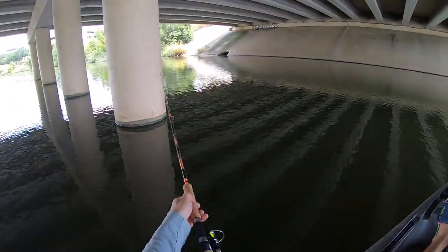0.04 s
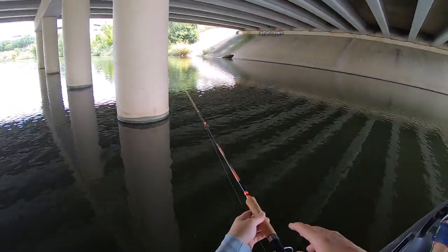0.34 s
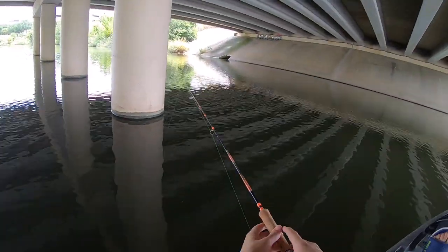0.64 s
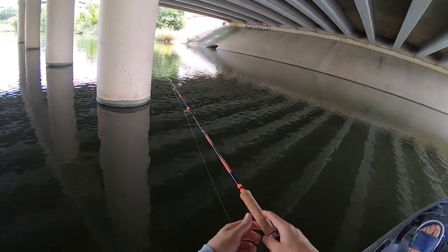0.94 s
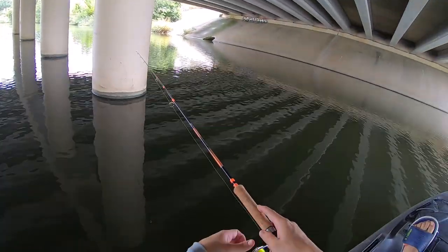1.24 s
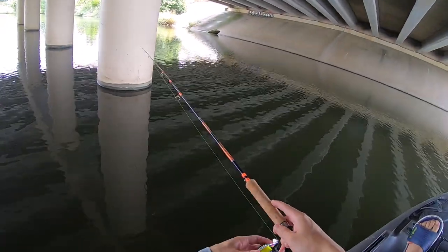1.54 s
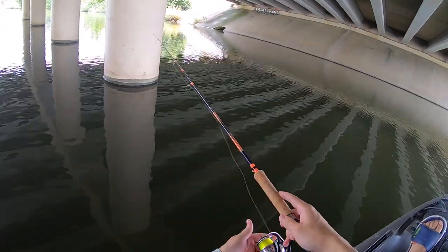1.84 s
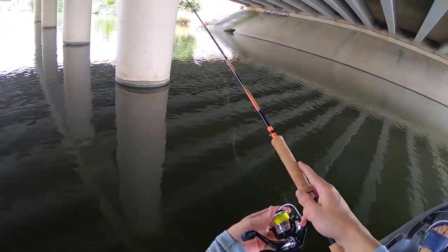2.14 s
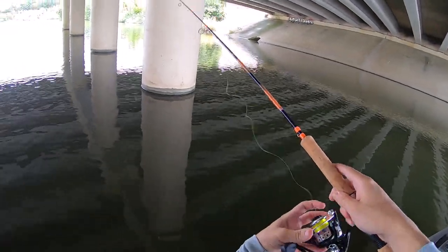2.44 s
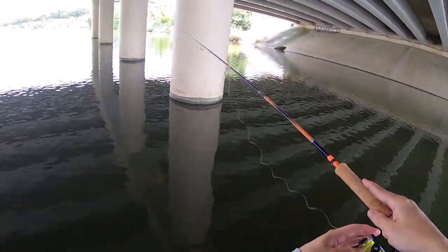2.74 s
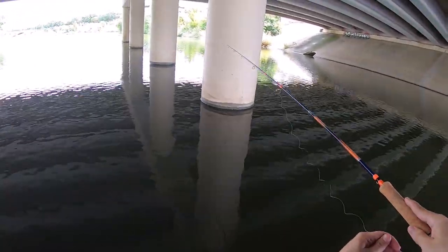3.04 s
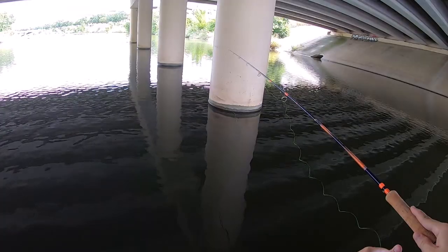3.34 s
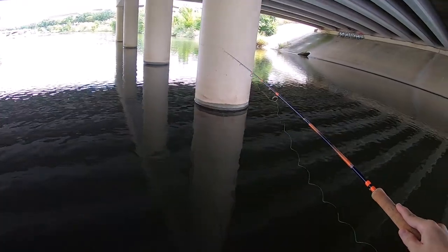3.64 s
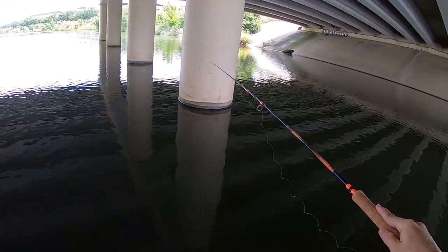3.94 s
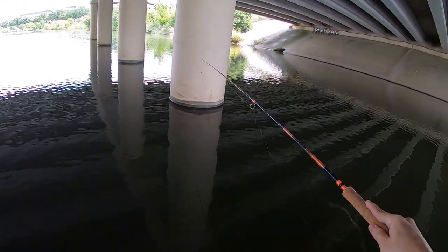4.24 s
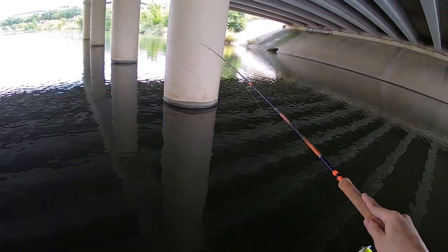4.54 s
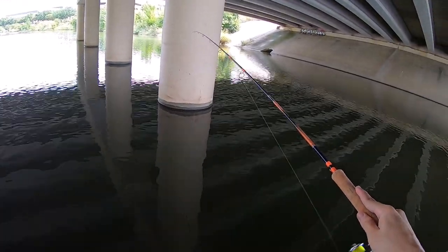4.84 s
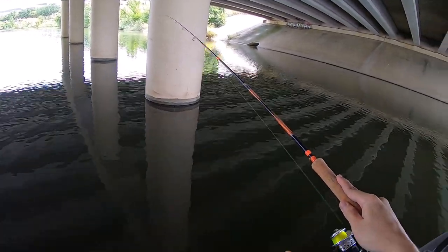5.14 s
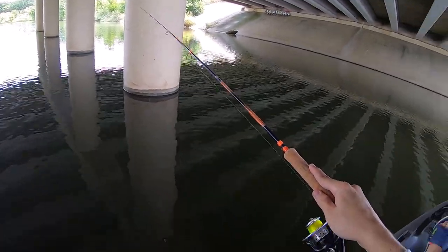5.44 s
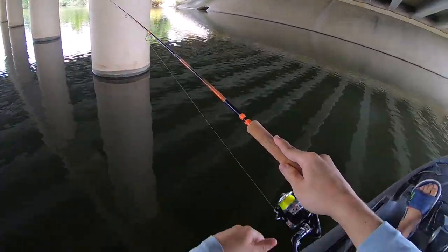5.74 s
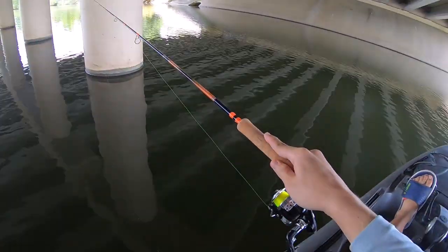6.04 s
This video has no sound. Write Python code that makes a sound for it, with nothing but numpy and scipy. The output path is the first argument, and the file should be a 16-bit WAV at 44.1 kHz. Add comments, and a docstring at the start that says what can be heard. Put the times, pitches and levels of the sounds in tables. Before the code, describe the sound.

A low, steady traffic rumble sounds throughout, heard from beneath a concrete highway bridge. In the first half second a sleeve brushes close by and fishing line hisses softly off a spinning reel, rubbing faintly afterwards. Vehicles boom gently overhead from about 0.8 and 2.5 seconds. Small reel ticks come between 1.4 and 2.3 seconds, then at 2.5 the reel's wire arm snaps shut, sharp and metallic, close and slightly right, with a brief echo. Light tackle clicks and knocks follow around 3.8 and 4.2 seconds. From 3.8 seconds the traffic grows louder, with roaring, thinly singing tyres and a wavering low hum from the bridge deck. Axles thump over a joint at 3.8, 5 and, heaviest, 5.5 seconds. The line gives a few very faint squeaks between 5 and 5.7 seconds as the roar continues to the end.

```python
"""Traffic rumbles through a concrete highway bridge, heard from a fishing kayak underneath. Four vehicles
cross overhead, booming in the span; with the last two, tyres sing, the deck hums and axles thump a joint.
Close by, a sleeve brushes past, line hisses off a spinning reel and squeaks in the guides, the bail wire
snaps shut and the tackle ticks and knocks. The concrete throws these small, hard sounds back."""
import sys
import numpy as np
from scipy import signal
from scipy.fft import rfft, irfft
from scipy.io import wavfile

SR = 44100
rng = np.random.default_rng(int(sys.argv[2]) if len(sys.argv) > 2 else 0)


def waveform_to_disk(signal):
    """Save audio, clipped to [-1, 1], as 16-bit WAV at the path in sys.argv[1]."""
    frames = np.transpose(np.atleast_2d(signal))
    scaled = np.clip(frames, -1, 1) * 32767
    samples = np.round(scaled).astype(np.int16)
    wavfile.write(sys.argv[1], SR, samples)


N = 268128
T, HZ = np.arange(N) / SR, np.fft.rfftfreq(N, 1 / SR)

# Stereo image of diffuse sound. Each row: frequency in Hz, left-right correlation.
STEREO_LIKENESS = [(25, 0.93), (60, 1), (160, 1), (290, 0.98), (450, 0.9), (680, 0.62), (1400, 0.18),
                   (3100, 0.31), (5000, 0.12), (7500, -0.27), (10000, -0.32), (14000, 0.51)]
# Tone of far traffic, tyres overhead and the loaded span. Each row: frequency in Hz, relative level in dB.
TRAFFIC_EQ = [(12, -7), (48, -0.5), (68, -8), (115, -3), (142, -7.5), (180, -4), (240, -10.5), (310, -14),
              (380, -18.5), (470, -20), (700, -22), (1000, -23.5), (1600, -33), (2400, -40.5),
              (6000, -61.5), (16000, -88)]
ROAR_EQ = [(10, -47), (100, -4), (200, 5.5), (270, 4.5), (370, -4), (450, -3), (580, -6), (700, -8.5),
           (850, -9), (1100, -9), (1500, -18.5), (2200, -29), (4000, -61), (12000, -92)]
BOOM_EQ = [(15, -18), (45, -3), (85, 2), (130, -1), (185, -2.5), (235, -14), (320, -22), (600, -59),
           (3000, -110)]
# Vehicles overhead. Each row: arrival on the span in seconds, then boom, tyre roar and sway in dB.
VEHICLES = [(.8, -36, -45.5, -3), (2.45, -37, -55, 4.5), (3.76, -32.5, -39, -8), (4.97, -31.5, -34, -3.5)]
# Trim for a vehicle on the neighbouring spans: boom, tyre roar and sway in dB.
OFF_SPAN_DB = [-7.5, -5, 2.5]
# Resonances of the deck and the hollow below. Each row: pitch in Hz, half-width in Hz,
# level under steady traffic in dB, level against the tyre roar in dB.
DECK_MODES = [(41.35, 5.3, -38, -15), (55.7, 3, -43, -3.5), (167.8, 4.9, -46.5, -4.5),
              (210.4, 7.2, -49, -6), (340.3, 17.3, -52.5, -10.5), (415.1, 14.2, -49.5, -11),
              (704, 32, -66, -13)]
# A thin whine in the traffic. Each row: harmonic number, relative level in dB.
WHINE_HARMONICS = [(3, 6), (4, -9), (6, -15.5)]
# Tone of microphone hiss, sliding cloth and running line. Each row: frequency in Hz, relative level in dB.
HISS_EQ = [(1500, -10), (4000, -7), (5800, -8), (7500, -1), (9900, 0), (11200, -13), (14200, -13),
           (15400, -25)]
SLEEVE_EQ = [(200, -31), (1500, 9.5), (3000, -2.5), (5500, -4), (7500, -0.5), (10000, -7), (12000, -21),
             (16000, -26.5)]
LINE_EQ = [(1200, -1.5), (2500, -0.5), (4500, -5), (5700, -10), (7200, 0), (9800, 2.5), (11200, -14.5),
           (15000, -23)]
# Sleeve strokes as the hands change over. Each row: start in seconds, length in seconds, level in dB.
BRUSHES = [(-.05, 0.15, -54.5), (.14, 0.34, -54.5), (.87, .22, -60), (2.58, 0.085, -54), (5.04, .074, -63)]
# Line is cast, slips through the fingers, is gathered and comes taut. Columns as for BRUSHES.
LINE_RUNS = [(0.015, 0.69, -57), (.86, 1.57, -63.5), (2.25, .71, -61.5), (4.25, 1.3, -67.5),
             (5.55, .55, -65)]
# Reel ticks and duller tackle knocks. Each row: time in seconds, energy in dB, t60 in seconds, tilt in dB
# per octave, pitch of the struck part in Hz, strike strength against the scrape, ring of the part in dB.
TICKS = [(1.392, -36, .02, 7, 6000, 2, 3), (1.828, -36, .015, 2, 5800, 2, 3),
         (2.105, -26.5, .015, -7, 2900, 1, 5), (2.2364, -18, 0.0079, 0, 4230, 6.3, 0),
         (2.301, -25, 0.024, 4, 4800, 7.4, 0), (2.322, -30, .06, 1, 5400, 1, 3),
         (2.4615, -18, 0.029, -7, 3400, 0.5, 6), (2.4701, -13.5, .008, -3, 4440, 1, 16),
         (2.4722, -16, 0.023, 0, 7800, 0.5, 3), (2.4765, -10.5, 0.05, 1, 4600, 0.5, 1),
         (2.4803, -4.5, .008, 0, 4760, 6, 2), (2.4826, -5.5, 0.021, -6, 7000, 1, 4),
         (2.4882, -15, 0.0068, -8, 4100, 3, 3), (2.5015, -18, 0.044, -4, 7600, 2, 7),
         (3.7549, -23.5, 0.0091, 1, 6900, 4.5, -1), (4.6275, -32, .015, -1, 7500, 6.8, 5)]
KNOCKS = [(3.8275, -22.5, 0.013, -2, 2250, 4.2, -6), (3.847, -27.5, .08, 0, 2900, 2, -1.5),
          (4.2212, -20, 0.02, -3.5, 2250, 4.6, -4), (4.2283, -26, .02, -4, 2300, 2, -8),
          (4.2357, -25.5, 0.022, -5, 2000, 3.5, 0), (4.2415, -25.5, 0.13, 3, 3550, 1, 3)]
# Tone of the ticks and knocks. Each row: frequency in Hz, relative level in dB.
TICK_EQ = [(200, -55), (700, -26), (1500, -12), (2300, 5.5), (3300, 2), (4600, 1.5), (5500, -0.5),
           (7100, 3.5), (10000, -1), (11500, -20), (13300, -14), (15000, -21)]
KNOCK_EQ = [(200, -41), (900, -21), (1500, -6), (2400, -7.5), (3000, -13.5), (5600, -16), (9500, -11.5),
            (11200, -35), (15000, -36)]
# Reverb of the concrete. Each row: frequency in Hz, t60 in seconds.
REVERB_DECAY = [(500, 1.3), (2500, 2), (6000, 0.68), (12000, 0.18)]
# The bail trips, shuts and rebounds. Each row: time in seconds, level in dB, seconds until it is damped.
BAIL_HITS = [(2.4708, -15, .004), (2.478, -4.5, 0.002), (2.4824, -0.5, 0.0079), (2.4986, -17, .004),
             (2.5125, -18, 0.0035)]
# Ring of the bail wire. Each row: pitch in Hz, level against the hit in dB, t60 in seconds.
BAIL_MODES = [(2090, -23, 0.07), (2437, -42, .025), (2995, -42, .04), (3413, -43, 0.037), (4380, -34, .03),
              (4710, -32, 0.027), (6830, -43, 0.021)]
# Tyres sing near 700 Hz, and the deck's low hum swells near 168 and 213 Hz.
# Each row: start in seconds, length in seconds, level in dB, pitch in Hz.
BRIDGE_TONES = [(3.95, 0.83, -52.5, 672), (4.908, 0.36, -52, 736), (5.859, 0.25, -44, 723),
                (3.811, 0.25, -37.5, 168), (4.423, .17, -30.5, 169.2), (4.578, 0.062, -28, 216.5),
                (5.187, 0.12, -30, 213.3), (5.354, 0.51, -36, 213.7)]
# Body of the hollow tackle. Each row: pitch in Hz, half-width in Hz, gain in dB.
HOLLOW_MODES = [(1510, 150, 7), (2270, 250, 4.5), (4400, 400, -2)]
# Axles hit a joint. Each row: time in seconds, thump level in dB, thump t60 in seconds, slap level in dB.
AXLES = [(3.842, -26, 0.12, -31), (4.993, -25.5, 0.19, -26), (5.459, -19, 0.44, -21)]
# Ring of the struck span. Each row: pitch in Hz, level against the thump in dB.
SPAN_MODES = [(53.8, 3.5), (205, -13.5), (420, -13.5)]
# Tone of the axle thump and the tyre slap. Each row: frequency in Hz, relative level in dB.
THUMP_EQ = [(15, -12), (50, 7), (90, -14), (200, -15.5), (420, -19), (2000, -64), (8000, -110)]
SLAP_EQ = [(100, -17), (220, -2), (310, -4), (420, 4.5), (600, -12), (850, -5), (1300, -23), (2500, -47),
           (8000, -88)]
# Line squeaks in the guides. Each row: start in seconds, length in seconds, level in dB, pitch in Hz.
SQUEAKS = [(4.927, .03, -68, 6300), (5.52, .05, -75, 4500), (5.66, .03, -71, 4600)]


def gain_of(db):
    """Decibels to amplitude."""
    return 10 ** (np.asarray(db) / 20)


def unit_rms(x):
    """The signal scaled to rms 1."""
    return x / np.sqrt(np.mean(x ** 2) + 1e-20)


def curve(points, hz):
    """A table joined by straight lines over log frequency."""
    f, value = np.transpose(points)
    return np.interp(np.log(hz + 1), np.log(f + 1), value)


def stroke(start, length, db, rise, fall):
    """Envelope of a rub: attack, hold, release."""
    age = np.maximum(T - start, 0)
    return gain_of(db) * (1 - np.exp(-age / rise)) * np.exp(-np.maximum(age - length, 0) / fall)


def blow(start, t60, rise):
    """Envelope of a hit: quick attack, then 60 dB down in t60 seconds."""
    age = np.maximum(T - start, 0)
    return (1 - np.exp(-age / rise)) * np.exp(-np.log(1000) * np.minimum(age / t60, 10))


def drift(hz):
    """Random modulation of rms 1, no faster than about hz."""
    return unit_rms(irfft(rfft(rng.standard_normal(N)) * np.exp(-(HZ / hz) ** 2) * (HZ > 0), N))


def pan(left_db):
    """Channel gains that set the left side left_db above the right."""
    return gain_of(np.array([[left_db], [-left_db]]) / 2)


def diffuse(shape):
    """Shaped noise from all sides: centred in the bass, wide in the treble."""
    likeness = np.clip(curve(STEREO_LIKENESS, HZ), -1, 1)
    mid, side = rfft(rng.standard_normal((2, N))) * shape * np.sqrt([1 + likeness, 1 - likeness])
    return unit_rms(irfft(np.array([mid + side, mid - side]), N))


def wash(eq):
    """Diffuse noise of rms 1 with the tone of an EQ table."""
    return diffuse(gain_of(curve(eq, HZ)))


def passing(cross_s=1.33, half_power_s=0.77, roll_on_s=0.043, roll_off_s=0.28):
    """Gains of boom, tyre roar and sway: each vehicle falls off as 1 / distance, and their powers add."""
    power = np.zeros((3, N))
    for start, *levels_db in VEHICLES:
        age = T - start
        on_span = (np.tanh(age / roll_on_s) - np.tanh((age - cross_s) / roll_off_s)) / 2
        distance = np.hypot(1, (age - cross_s / 2) / half_power_s)
        trim = gain_of(np.outer(OFF_SPAN_DB, 1 - on_span))
        power += (gain_of(levels_db)[:, None] * trim / distance) ** 2
    return np.sqrt(power)


def traffic(load, roar, far_db=-32, wander_db=0.43, flutter_db=0.34):
    """A bed of far traffic under the vehicles overhead, all uneven as tyres meet the road."""
    far = wash(TRAFFIC_EQ) * gain_of(far_db)
    overhead = wash(BOOM_EQ) * load + wash(ROAR_EQ) * roar
    return far * gain_of(wander_db * drift(hz=2.5)) + overhead * gain_of(flutter_db * drift(hz=22))


def deck(roar, sway):
    """Narrow resonances shaken at random by all the wheels; the lowest follow the sway of the span."""
    out = np.zeros((2, N))
    for hz, width, steady_db, near_db in DECK_MODES:
        steady = gain_of(steady_db) * (sway if hz < 100 else 1)
        drive = np.hypot(steady, gain_of(near_db) * roar)
        out += drive * diffuse(1 / (1 + ((HZ - hz) / width) ** 2))
    return out


def whine(roar, pitch_hz=424, waver=0.0024, fading_db=-2.5, steady_db=-58.5, near_db=-19.5):
    """Thin harmonics of one wavering pitch swell with the roar and fade differently left and right."""
    turns = np.cumsum(pitch_hz * (1 + waver * drift(hz=22))) / SR
    tone = np.zeros((2, N))
    for channel in tone:
        for harmonic, db in WHINE_HARMONICS:
            level = gain_of(db + fading_db * drift(hz=11))
            channel += level * np.sin(2 * np.pi * (harmonic * turns + rng.random()))
    return unit_rms(tone) * np.hypot(gain_of(steady_db), gain_of(near_db) * roar)


def sleeve(grain_db=1.0):
    """Cloth slides in fine, uneven slips."""
    slips = wash(SLEEVE_EQ) * gain_of(grain_db * drift(hz=120))
    return slips * sum(stroke(*brush, rise=0.044, fall=0.041) for brush in BRUSHES) * pan(left_db=-4.5)


def fishing_line(flutter_db=0.6, slack_db=-68.5):
    """Coils rub over the spool lip and guides, loudest on the cast, never quite silent."""
    rub = wash(LINE_EQ) * gain_of(flutter_db * drift(hz=49.7))
    power = gain_of(slack_db) ** 2 + sum(stroke(*run, rise=0.066, fall=0.16) ** 2 for run in LINE_RUNS)
    return rub * np.sqrt(power) * pan(left_db=-2.5)


def clicks(rows, eq, spread, part_width_hz, contact_s=0.00028):
    """A sharp strike and a short scrape ring a small part of the tackle."""
    out = np.zeros((2, N))
    size, lead = 16384, 256  # samples
    hz = np.fft.rfftfreq(size, 1 / SR)
    for start, db, t60, tilt_db, part_hz, strike, part_db in rows:
        first = round(start * SR) - lead
        span = slice(first, first + size)
        age = T[span] - start
        centre, left, right = rng.standard_normal((3, size))
        envelope = np.clip(age / contact_s, 0, 1) * gain_of(-60 * abs(age) / t60)
        scrape = (centre + spread * np.array([left, right])) * envelope
        contact = scrape + strike * np.sinc(age * SR)
        colour = gain_of(curve(eq, hz) + tilt_db * np.log2(np.maximum(hz, 1000)))
        resonance = 1 + gain_of(part_db) / (1 + 2j * (hz - part_hz) / part_width_hz)
        click = irfft(rfft(contact) * colour * resonance)
        out[:, span] += gain_of(db) * click / np.linalg.norm(click)
    return out


def concrete(send, early_db=9, early_t60=0.15, predelay_s=0.004):
    """Quick reflections off hull and water, then the long tail under the bridge."""
    t = np.arange(SR) / SR
    hz, age, bands = signal.stft(rng.standard_normal((2, SR)), SR, nperseg=256)
    decay = gain_of(-60 * age / curve(REVERB_DECAY, hz)[:, None])
    tail = signal.istft(bands * decay, SR, nperseg=256)[1][:, :SR]
    tail *= (t > predelay_s) * (1 + gain_of(early_db - 60 * t / early_t60))
    return signal.fftconvolve(send, tail / np.linalg.norm(tail[0]), axes=1)[:, :N]


def bail(damping_s=0.0021, chatter_rad=0.31):
    """The sprung wire chatters after each contact and is damped against its stop."""
    envelopes = np.zeros((len(BAIL_MODES), N))
    for start, db, free_s in BAIL_HITS:
        choke = np.exp(-np.maximum(T - start - free_s, 0) / damping_s)
        envelopes += gain_of(db) * choke * [blow(start, t60, rise=0.0014) for _, _, t60 in BAIL_MODES]
    chatter = chatter_rad * drift(hz=500)
    return sum(gain_of(db) * envelope * np.sin(2 * np.pi * (hz * T + rng.random()) + chatter)
               for (hz, db, _), envelope in zip(BAIL_MODES, envelopes))


def bridge_tones(waver=0.0099, fading_db=4.5, edge_s=0.029, doppler=0.015, smear_turns=0.088):
    """Singing tyres and the deck's low hum: wavering tones that sink and fade in and out."""
    out = np.zeros((2, N))
    for start, length, db, hz in BRIDGE_TONES:
        sink = doppler * np.tanh(2 * (T - start) / length - 1)
        turns = np.cumsum(hz * (1 - sink + waver * drift(hz=26))) / SR
        likeness = np.clip(curve(STEREO_LIKENESS, hz), -1, 1)
        voices = []
        for share in ((1 + likeness) / 2, (1 - likeness) / 2):
            fading = gain_of(fading_db * drift(hz=22))
            tone = np.sin(2 * np.pi * (turns + smear_turns * drift(hz=7.9)))
            voices.append(np.sqrt(share) * unit_rms(fading * tone))
        mid, side = voices[0], signal.hilbert(voices[1]).imag  # a quarter turn apart, for width
        out += stroke(start, length, db, edge_s, edge_s) * np.array([mid + side, mid - side])
    return out


def hollow_tackle(knocks):
    """Broad resonances of a hollow body, added to the knocks themselves."""
    modes = sum(gain_of(db) / (1 + 2j * (HZ - hz) / width) for hz, width, db in HOLLOW_MODES)
    return irfft(rfft(knocks) * (1 + modes), N)


def joint(boom_db=-5, slap_lag_s=0.014, slap_t60=0.095):
    """Each axle rings the span with a dull boom, and its tyres slap the far edge of the joint."""
    rings, booms, slaps = np.zeros((3, N))
    for start, db, t60, slap_db in AXLES:
        modes = sum(gain_of(mode_db) * np.sin(2 * np.pi * hz * (T - start)) for hz, mode_db in SPAN_MODES)
        rings += gain_of(db) * blow(start, t60, rise=0.0052) * modes
        booms += gain_of(db + boom_db) * blow(start, t60, rise=0.004)
        slaps += gain_of(slap_db) * blow(start + slap_lag_s, slap_t60, rise=0.0066)
    return rings + booms * wash(THUMP_EQ) + slaps * wash(SLAP_EQ)


def squeaks(width_hz=220, edge_s=0.014):
    """Line sticks and slips in a guide: a short, fuzzy whistle."""
    slips = rfft(rng.standard_normal(N))
    out = np.zeros(N)
    for start, length, db, hz in SQUEAKS:
        whistle = unit_rms(irfft(slips / (1 + ((HZ - hz) / width_hz) ** 2), N))
        out += stroke(start, length, db, edge_s, edge_s) * whistle
    return out * pan(left_db=-6)


def scene():
    """The bridge above, a faint hiss, and the tackle close on the right with its echo."""
    load, roar, sway = passing()
    bridge = traffic(load, roar) + deck(roar, sway) + whine(roar) + bridge_tones() + joint()
    hiss = gain_of(-65) * wash(HISS_EQ) * pan(left_db=-0.5)
    rubs = sleeve() + fishing_line() + squeaks()
    ticks = clicks(TICKS, TICK_EQ, spread=0.82, part_width_hz=690)
    knocks = hollow_tackle(clicks(KNOCKS, KNOCK_EQ, spread=1.0, part_width_hz=260))
    snap = bail()
    echo = concrete(gain_of(-11) * ticks + gain_of(-6.5) * knocks + gain_of(-20) * snap)
    tackle = (ticks + knocks) * pan(left_db=-5.5) + snap * pan(left_db=-11) + echo * pan(left_db=-2)
    return bridge * pan(left_db=-0.73) + hiss + rubs + tackle


def record(dry, low_cut_hz=13, high_cut_hz=15300):
    """Trim the deepest bass and the top of the treble."""
    thinned = signal.sosfilt(signal.butter(4, low_cut_hz, "highpass", fs=SR, output="sos"), dry)
    high_cut = signal.firwin(255, high_cut_hz, window=("kaiser", 9), fs=SR)
    return signal.oaconvolve(thinned, high_cut[None], "same")


dry = scene()
out = record(dry)
waveform_to_disk(out)
```